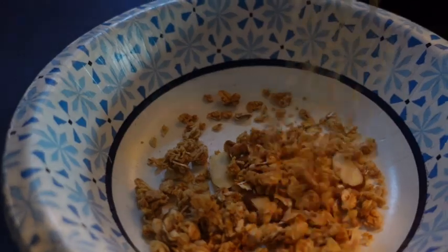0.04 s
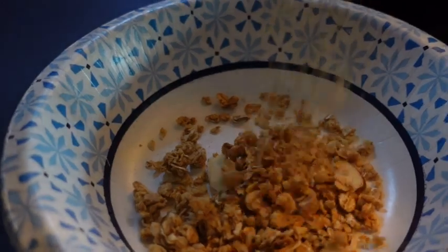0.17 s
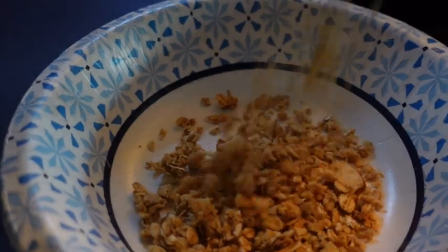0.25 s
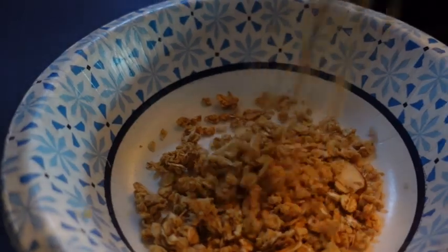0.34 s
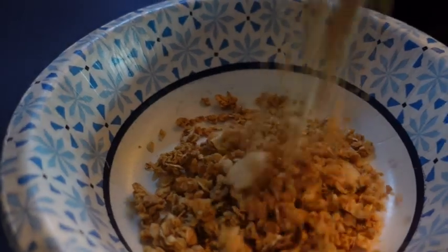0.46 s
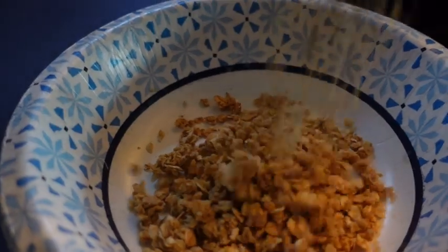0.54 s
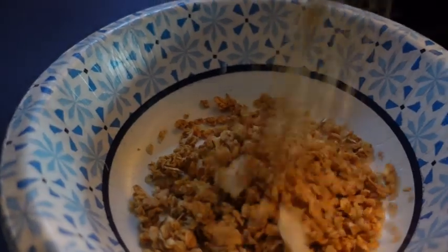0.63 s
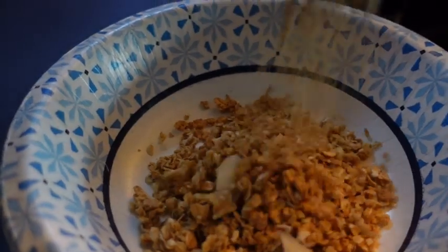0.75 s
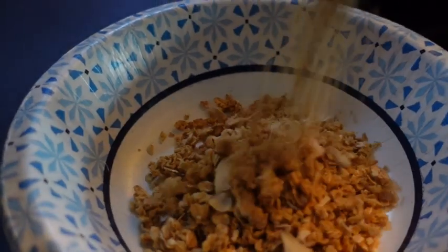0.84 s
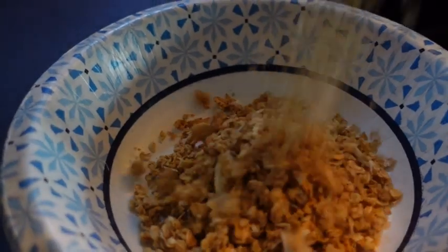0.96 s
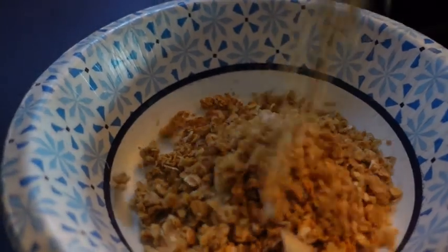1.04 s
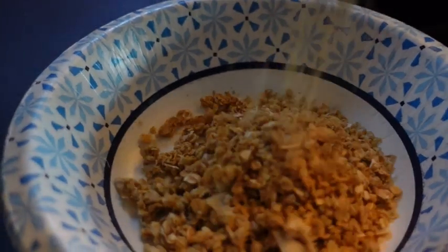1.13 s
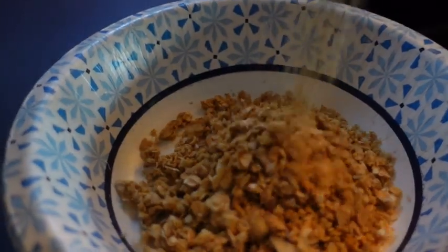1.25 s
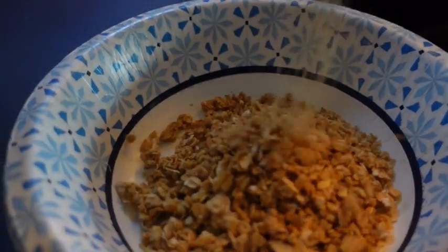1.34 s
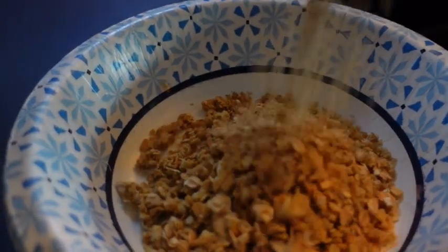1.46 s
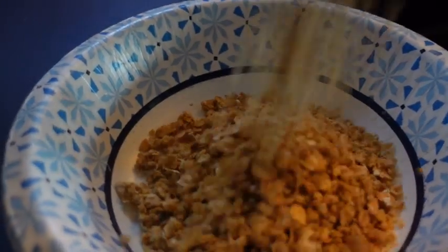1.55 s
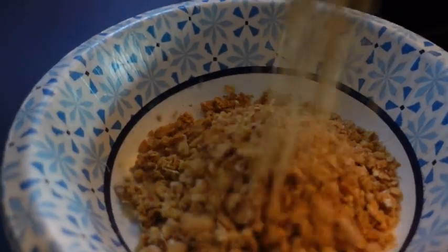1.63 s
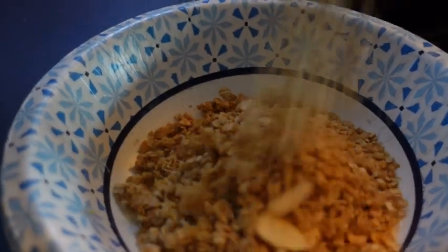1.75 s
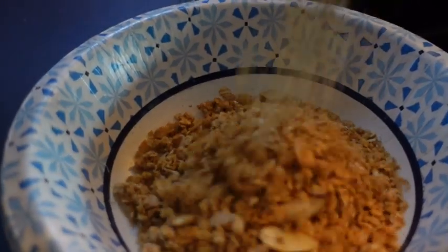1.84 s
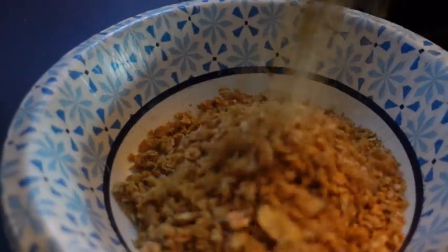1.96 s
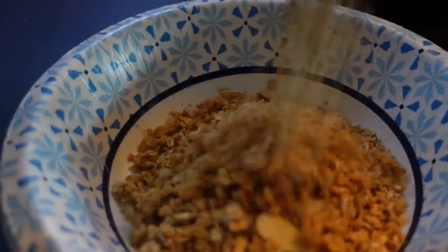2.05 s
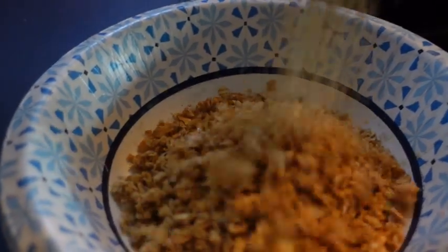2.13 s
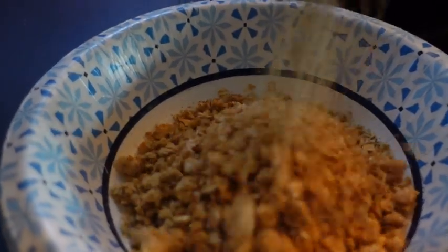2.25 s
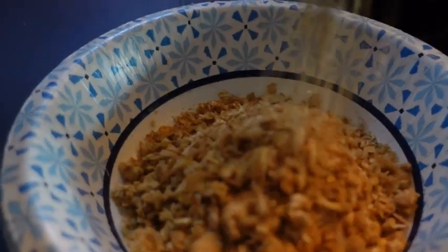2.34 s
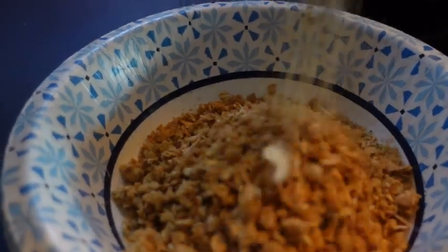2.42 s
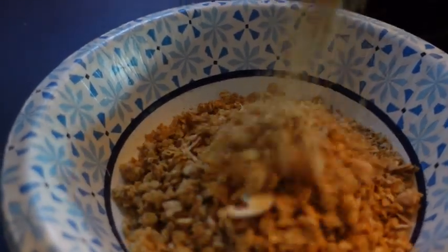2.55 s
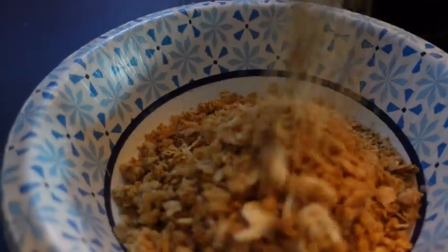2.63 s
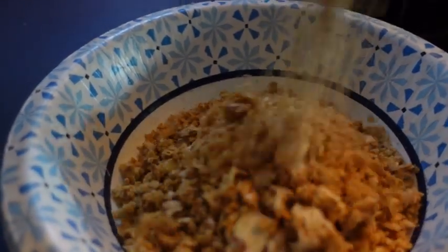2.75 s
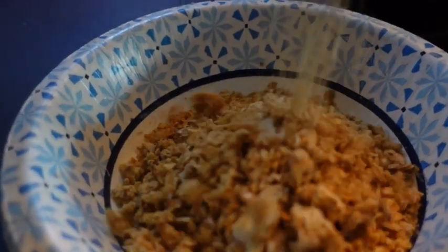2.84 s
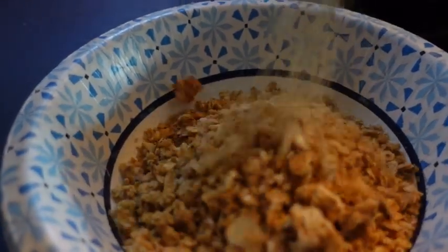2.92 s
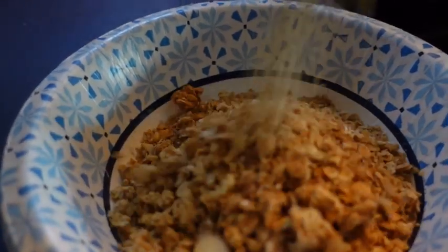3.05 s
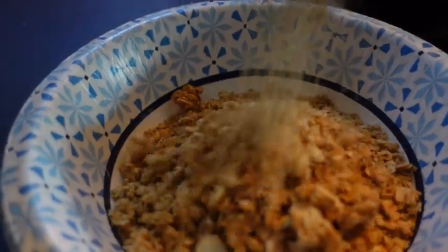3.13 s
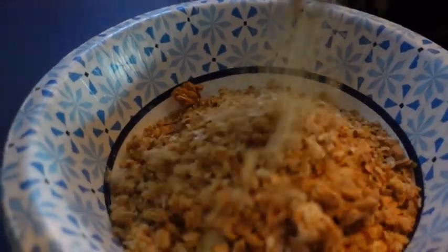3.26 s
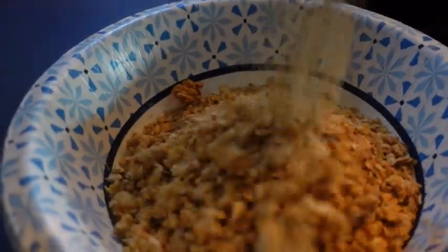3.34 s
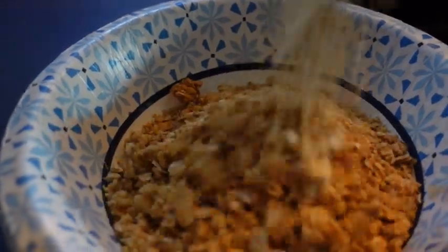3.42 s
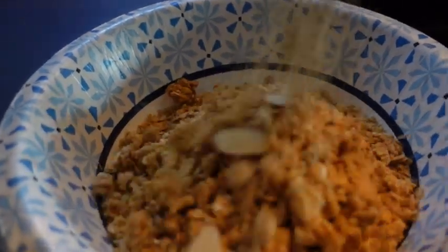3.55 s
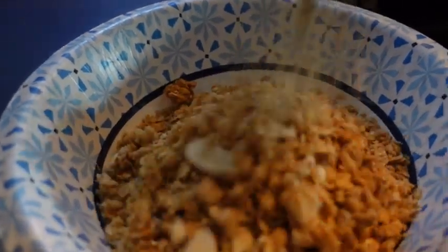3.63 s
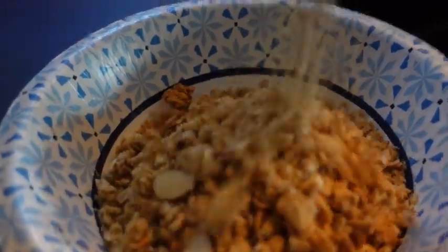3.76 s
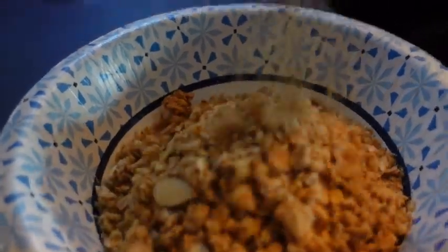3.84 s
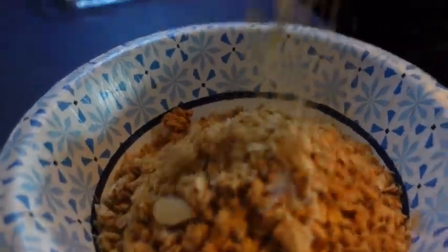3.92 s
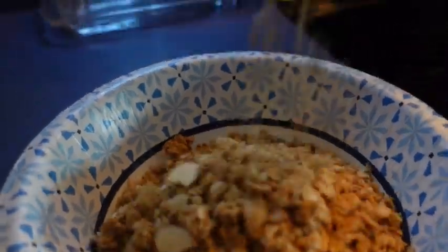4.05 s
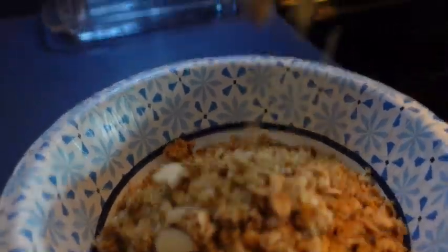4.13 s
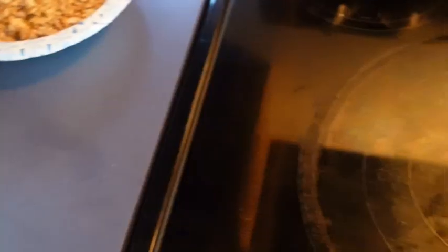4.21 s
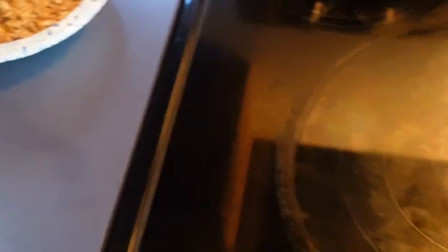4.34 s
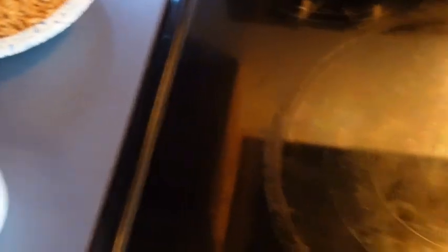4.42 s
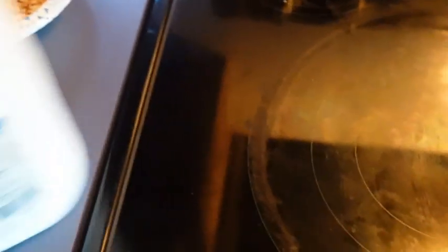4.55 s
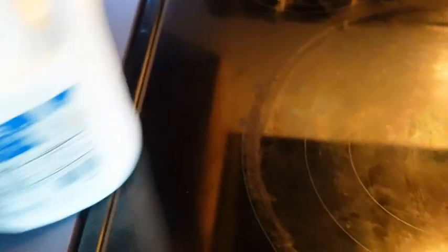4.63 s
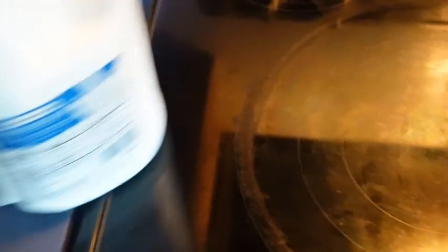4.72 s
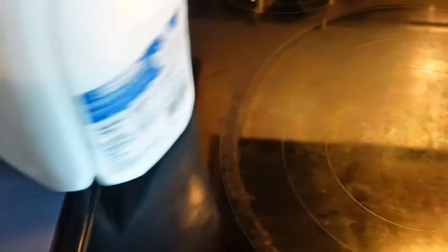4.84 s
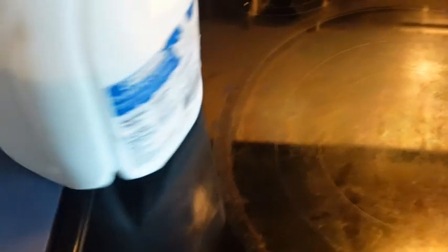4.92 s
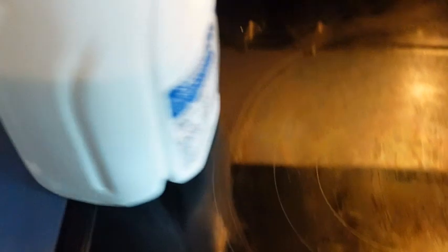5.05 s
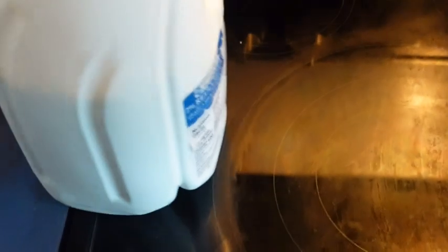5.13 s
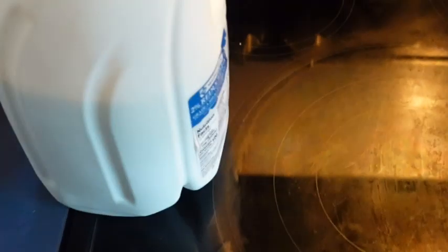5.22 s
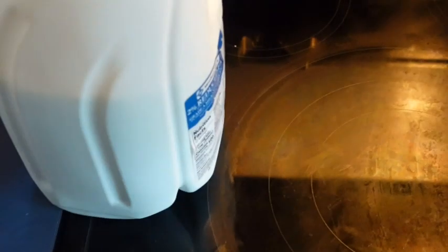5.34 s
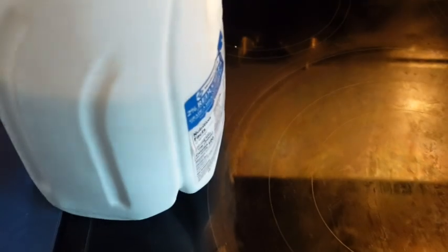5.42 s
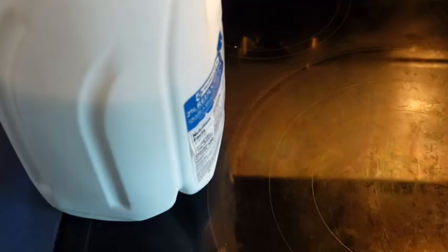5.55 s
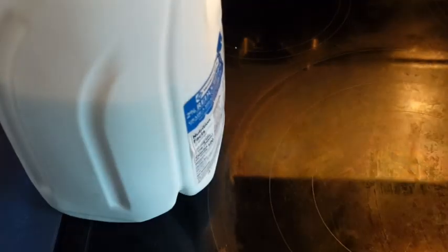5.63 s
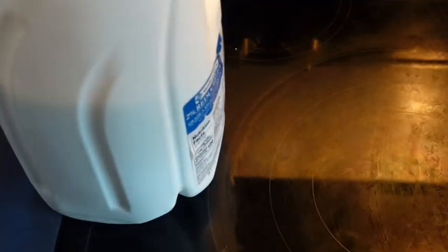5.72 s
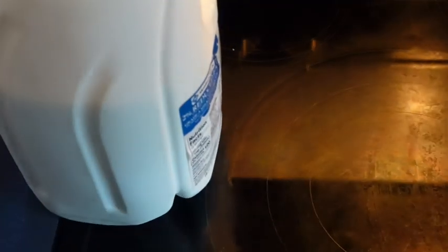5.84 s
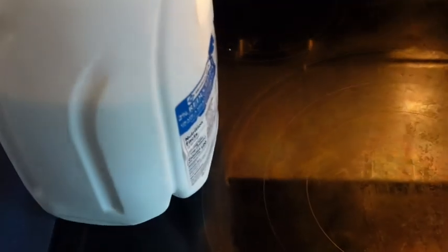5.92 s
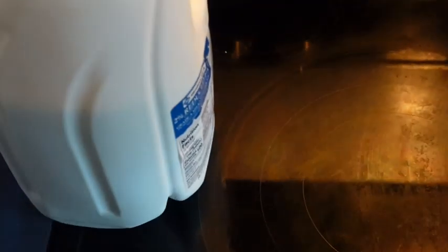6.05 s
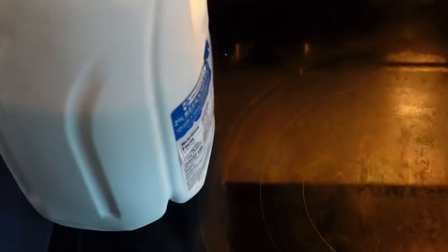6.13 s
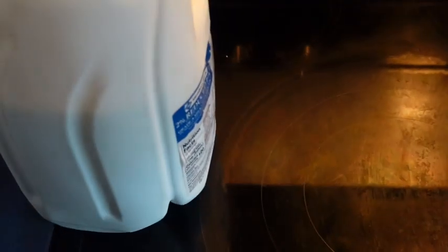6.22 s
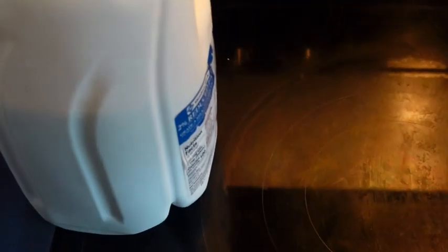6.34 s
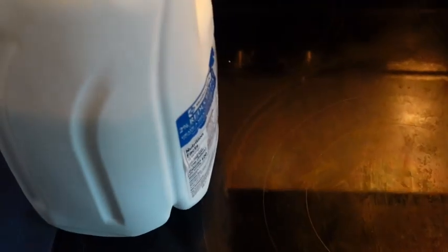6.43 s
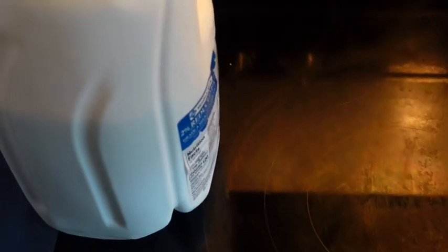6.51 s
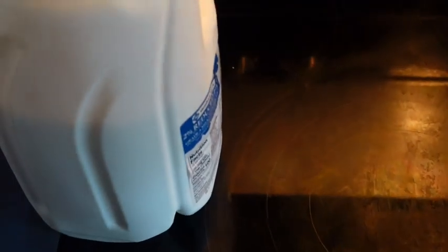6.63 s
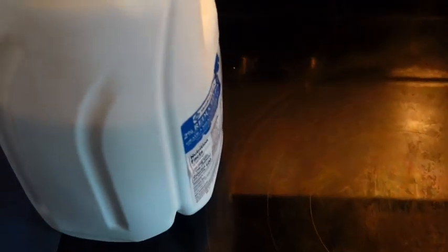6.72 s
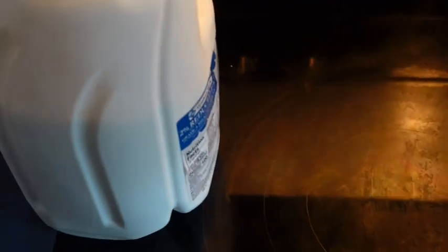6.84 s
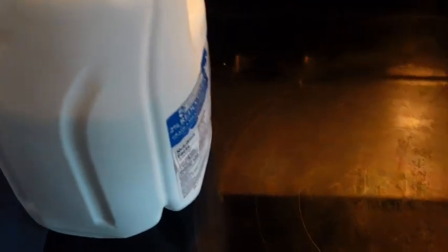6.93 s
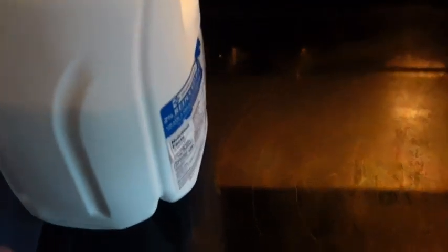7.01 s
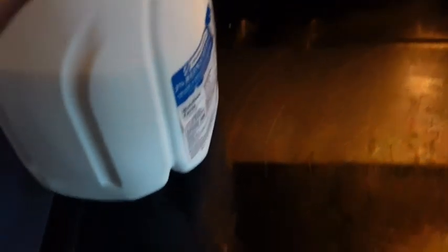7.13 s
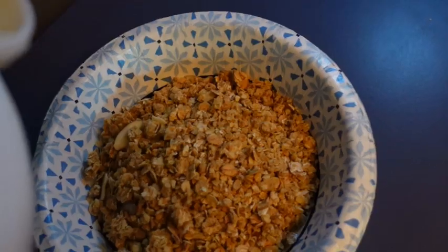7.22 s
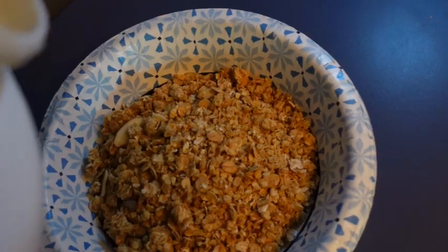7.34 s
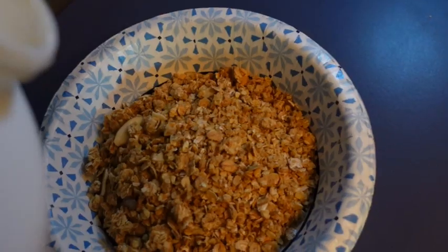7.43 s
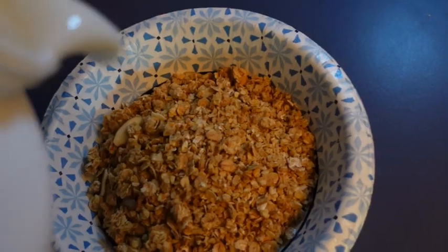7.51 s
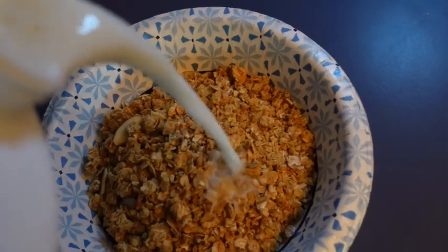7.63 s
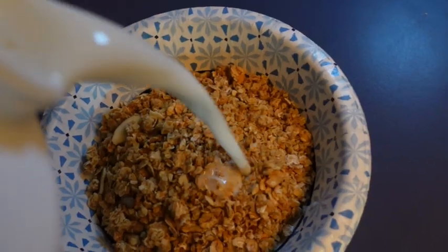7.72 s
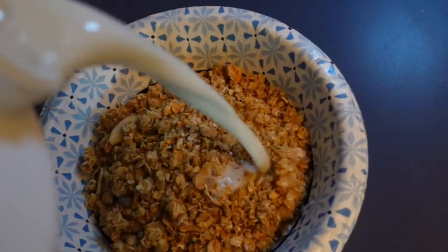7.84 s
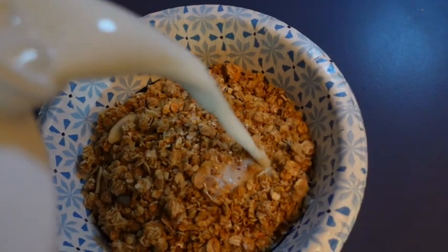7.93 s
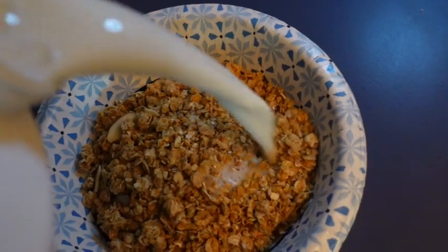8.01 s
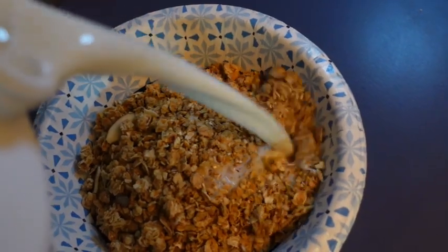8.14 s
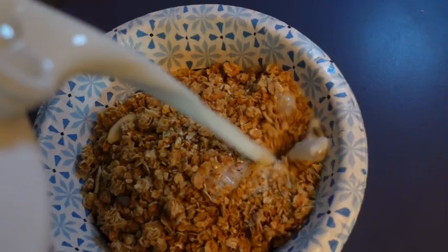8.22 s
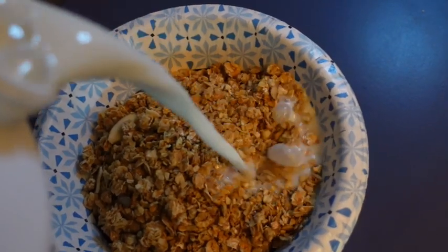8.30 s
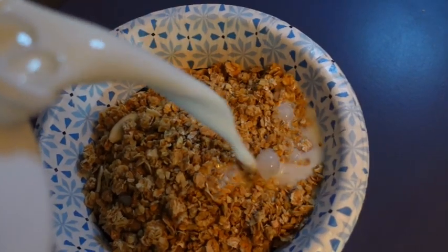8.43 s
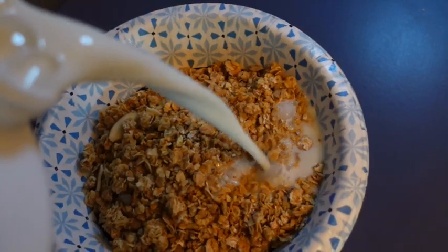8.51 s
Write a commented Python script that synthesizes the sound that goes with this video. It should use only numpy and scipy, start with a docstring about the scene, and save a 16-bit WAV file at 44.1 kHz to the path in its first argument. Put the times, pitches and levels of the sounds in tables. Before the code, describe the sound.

Loud dry grains and crunchy lumps rattle into a paper bowl for about four seconds, the bowl's ring dulling as it fills. Then a milk jug, slightly left and farther off, drags with a gritty hiss, knocks twice or so and goes still over faint hum. Finally a close, bright fizz swells with small ringing pops. Short indoor room reflections and soft air noise throughout.

```python
"""Over room air and faint appliance tones, granola patters into a paper bowl: dense random grains,
with louder clusters as noise snaps that ring the bowl's modes.
After a cut, a full plastic jug scrapes from counter to stove top: banded grains, a faint groan, modal bumps, ticks.
After another cut, the jug bumps again softly, then cereal fizzes and crackles as it soaks up milk:
fine grains for bubbles and froth, ringing snaps for popping air pockets."""
import sys
import numpy as np
from scipy import signal
from scipy.fft import rfft, irfft, next_fast_len
from scipy.io import wavfile
from scipy.ndimage import uniform_filter1d

SR = 44100
rng = np.random.default_rng(int(sys.argv[2]) if len(sys.argv) > 2 else 0)


def inscribe(sig):
    """Save sig as 16-bit PCM at rate SR to the path in sys.argv[1].

    A 1-D sig is mono; a 2-D sig holds one channel per row.
    Samples are clipped to [-1, 1] before scaling.
    """
    pcm = np.round(np.clip(np.atleast_2d(sig).T, -1, 1) * 32767)
    wavfile.write(sys.argv[1], SR, pcm.astype(np.int16))


N = 377937
T = np.arange(N) / SR
CUTOFF_HZ = 16050   # top of the audible band here

# cuts between the three shots: time [s]
CUT_TIMES_S = [4.163, 7.163]
# granola flow out of the box, as patter level: (time [s], level [dB])
POUR_FLOW = [(0.0, -19), (0.39, -20.5), (1.18, -22.5), (1.62, -19.5), (1.93, -23), (2.45, -21.5),
             (2.9, -23), (3.24, -19), (3.85, -25.5), (3.98, -28), (4.1, -31), (4.15, -40)]
# jug bumps: (time [s], level [dB], contact softness [s])
JUG_BUMPS = [(4.860, -28, 0.00026), (4.897, -25.5, 0.00085), (4.935, -31.5, 0.00046),
             (7.197, -34.5, 0.0016), (7.265, -41, .0015), (7.794, -37.5, 0.0013)]


def from_db(db):
    """Decibels to gain."""
    return 10 ** (np.asarray(db) / 20)


def rms_one(x):
    """Scale to unit rms."""
    return x / np.sqrt(np.mean(x ** 2) + 1e-20)


def drift(knots_per_s):
    """Random wander of unit rms, straight lines between random knots."""
    knots = rng.standard_normal(int(knots_per_s * N / SR) + 2)
    return rms_one(np.interp(T * knots_per_s, np.arange(len(knots)), knots))


def gain_curve(rows):
    """Gain along (time [s], level [dB]) rows, silent outside them."""
    s, db = np.transpose(rows)
    gate = np.interp(T, [s[0] - .01, s[0], s[-1], s[-1] + .01], [0, 1, 1, 0])
    return gate * from_db(np.interp(T, s, db))


def colour(x, spectrum):
    """Minimum-phase filter through (Hz, dB) points, falling 18 dB/octave beyond them; unit rms."""
    length = x.shape[-1]
    size = 2 * next_fast_len(length // 2 + SR // 8, real=True)
    log_hz = np.log2(np.maximum(np.fft.rfftfreq(size, 1 / SR), 1))
    points_hz, points_db = np.transpose(spectrum)
    points_oct = np.log2(points_hz)
    beyond_oct = np.abs(log_hz - np.clip(log_hz, points_oct[0], points_oct[-1]))
    shape_db = np.maximum(np.interp(log_hz, points_oct, points_db) - 18 * beyond_oct, -90)
    # keep the causal half of the cepstrum
    cepstrum = irfft(np.log(from_db(shape_db)))
    response = np.exp(2 * rfft(cepstrum[:size // 2], size))
    return rms_one(irfft(rfft(x, size) * response)[..., :length])


def resonate(x, hz, t60_s):
    """Two-pole resonance with unit gain at its peak."""
    r = from_db(-60 / (t60_s * SR))
    w = 2 * np.pi * min(hz, CUTOFF_HZ) / SR
    b = [(1 - r * r) / 2, 0, (r * r - 1) / 2]
    a = [1, -2 * r * np.cos(w), r * r]
    return signal.lfilter(b, a, x + 1e-18)


def steady(x):
    """Divide out the 0.1 s running level, so that the flow alone sets it."""
    return x / np.sqrt(np.abs(uniform_filter1d(x * x, SR // 10)) + 1e-9)


def grains(level, spectrum, per_s, spread_db, cycles, clump_db=0, count=30):
    """Random tiny impacts, swelling in clumps, each exciting a bank of resonances (60 dB decay in cycles)."""
    on = level > 0
    clicks = np.zeros(on.sum())
    at = np.flatnonzero(rng.random(len(clicks)) < per_s / SR)
    sizes = from_db(spread_db * np.minimum(rng.exponential(1, len(at)), 4))
    rings, out = 0, np.zeros(N)
    for hz in np.geomspace(spectrum[0][0], min(spectrum[-1][0], CUTOFF_HZ), count):
        # a grain has its own strength at every pitch
        clicks[at] = sizes * rng.standard_normal(len(at))
        rings = rings + resonate(clicks, hz, cycles / hz)
    out[on] = colour(rings, spectrum)
    return level * steady(out * from_db(clump_db))


def cracks(rows, crumble_s, ring_cycles, ring_db, overtone_db, top_hz, tail_db, tail_s):
    """Noise snaps that crumble away in uneven bits, each ringing at its own pitch with its bass removed."""
    out, t = np.zeros(N + SR), T[:SR // 16]
    for s, db, hz in rows:
        hz = min(hz, CUTOFF_HZ)
        bit_steps = np.repeat(rng.standard_normal(len(t)), 40)[:len(t)].clip(-2, 2)
        bits = rms_one(from_db(6.5 * bit_steps))
        fade = np.exp(-t / crumble_s) + from_db(tail_db) * bits * np.exp(-t / tail_s)
        burst = rng.standard_normal(len(t)) * fade
        highpass = signal.butter(4, hz * .6, "high", fs=SR, output="sos")
        lowpass = signal.butter(1, min(top_hz + hz, CUTOFF_HZ), fs=SR, output="sos")
        snap = signal.sosfilt(lowpass, signal.sosfilt(highpass, burst))
        ring = rms_one(resonate(snap, hz, ring_cycles / hz))
        overtone = rms_one(resonate(snap, hz * rng.uniform(1.4, 2), ring_cycles / hz))
        hit = rms_one(snap) + from_db(ring_db) * ring + from_db(overtone_db) * overtone
        start = int(s * SR)
        out[start:start + len(t)] += from_db(db) * hit / np.std(hit[t < .006])   # level of the first 6 ms
    return out[:N]


def appliance_tones(by_stove, waver_db, waver_rad):
    """Steady hum and whine, wavering slightly in level and phase."""
    # appliance tones: (frequency [Hz], level by the bowl [dB], level by the stove [dB])
    tone_rows = [(57, -63.5, -73), (115, -69, -71.5), (209.3, -62, -81), (231, -64, -70.5), (297, -68, -68),
                 (3225, -81.5, -99), (3480, -82, -99), (3700, -83, -88), (5152, -83, -105),
                 (5500, -105, -79.5), (7757, -81.5, -105)]
    out = 0
    for hz, bowl_db, stove_db in tone_rows:
        level_db = np.where(by_stove, stove_db, bowl_db) + waver_db * drift(7.8)
        phase = 2 * np.pi * hz * T + waver_rad * drift(12)
        out = out + np.sqrt(2) * from_db(level_db) * np.sin(phase)
    return out


def room_tone():
    """Coloured air noise, mostly in phase across the stereo pair, plus hum; levels change with the shot."""
    # air noise spectrum: (frequency [Hz], relative level [dB])
    air_bands = [(45, -28.5), (81, -12.5), (109, -11), (270, -5), (340, -10), (666, -15), (1630, -22.5),
                 (3310, -28.5), (6550, -33), (16000, -38)]
    # air noise in each shot, mid channel: level [dB]
    shot_air_db = [-51, -58.5, -55.5]
    shot = np.searchsorted(CUT_TIMES_S, T)
    mid, side = colour(rng.standard_normal((2, N)), air_bands)
    air = from_db(shot_air_db)[shot] * (mid + from_db(-7.5) * side * [[1], [-1]])
    return air + appliance_tones(shot == 1, waver_db=2.5, waver_rad=0.27)


def small_clusters(count):
    """Rows (s, dB, Hz) of lesser clusters scattered through the pour, following its flow."""
    level_db, spread_db, grow_db_per_s = -0.3, 2.5, 0.54   # against the flow; coarser pieces follow the crumbs
    middle_hz, spread_oct, dulls_oct_per_s = 4600, 1.08, 0.12   # lower as the heap deepens
    place = rng.random(count)
    size, pitch = rng.uniform(-1, 1, (2, count))
    s = (np.arange(count) + place) / count * POUR_FLOW[-2][0]
    flow_db = np.interp(s, *np.transpose(POUR_FLOW))
    db = flow_db + level_db + grow_db_per_s * s + spread_db * size
    hz = middle_hz * 2 ** (spread_oct * pitch - dulls_oct_per_s * s)
    return np.c_[s, db, hz]


def granola():
    """Flakes and crumbs arrive in the same clumps; the bowl rings less as the heap covers it."""
    # flake spectrum: (frequency [Hz], relative level [dB])
    flake_bands = [(90, -31), (150, -16.5), (260, -12.5), (450, -14), (640, -13.5), (780, -7), (1260, -5),
                   (1900, -0.5), (2900, -3.5), (4500, -3), (6000, -4)]
    # crumb spectrum: (frequency [Hz], relative level [dB])
    crumb_bands = [(1500, -25), (3000, -7), (5000, -3), (7000, -2.5), (10000, -3.5), (16000, -9)]
    # biggest clusters landing: (time [s], level [dB], pitch [Hz])
    big_clusters = [(0.068, -17, 4720), (0.118, -15.5, 8000), (0.162, -17, 5700), (0.379, -13.5, 5000),
                    (0.578, -15, 1900), (0.595, -16.5, 2000), (0.794, -15, 5000), (0.853, -15.5, 4200),
                    (0.879, -15.5, 1940), (0.91, -15, 2500), (0.942, -16.5, 2750), (0.973, -15.5, 2610),
                    (1.251, -17.5, 4070), (1.283, -16, 2810), (1.297, -16, 2000), (1.563, -13.5, 1920),
                    (1.602, -11, 4300), (1.632, -15.5, 1470), (1.691, -15.5, 4200), (1.706, -15.5, 2190),
                    (1.815, -17, 4805), (1.835, -14.5, 4280), (1.867, -20.5, 8540), (1.956, -10.5, 1830),
                    (2.024, -14, 5200), (2.04, -17.5, 6000), (2.174, -15.5, 3800), (2.278, -15, 2000),
                    (2.295, -18.5, 2910), (2.405, -16.5, 1860), (2.524, -15, 3950), (2.597, -14, 1980),
                    (2.636, -15, 3470), (2.722, -14.5, 3000), (2.8, -16, 3110), (2.92, -14.5, 1450),
                    (3.008, -12.5, 2100), (3.106, -15.5, 2300), (3.18, -16.5, 6950), (3.212, -14, 3700),
                    (3.224, -12, 3000), (3.28, -14, 3450), (3.293, -16.5, 2900), (3.345, -14, 2400),
                    (3.384, -13.5, 2220), (3.556, -16.5, 3000), (3.58, -14.5, 2500), (3.636, -15.5, 4050),
                    (3.777, -16, 5100), (3.788, -15.5, 2610), (3.825, -14.5, 2060), (3.845, -19.5, 2160),
                    (3.95, -19, 2500), (3.982, -13.5, 3080), (4.021, -20, 5540), (4.072, -20, 9000),
                    (4.115, -18.5, 14000), (4.125, -19.5, 2500)]
    # paper bowl modes: (frequency [Hz], relative level [dB], t60 [s])
    bowl_modes = [(790, -7, 0.059), (1450, 3.5, 0.04), (1920, 1, .03), (2958, -2.5, .02), (4940, -8, 0.012)]
    flakes_db, crumbs_db = -4.5, -0.6   # against the flow, at the start
    crumbs_thin_db_per_s = 0.8   # the fine crumbs run out first

    flow = gain_curve(POUR_FLOW)
    flakes = flow * from_db(flakes_db)
    crumbs = flow * from_db(crumbs_db - crumbs_thin_db_per_s * T)
    clumps_db = 2.0 * drift(90)
    coarse = grains(flakes, flake_bands, per_s=1300, spread_db=3.0, cycles=14.3, clump_db=clumps_db, count=40)
    fine = grains(crumbs, crumb_bands, per_s=2600, spread_db=2.5, cycles=20, clump_db=clumps_db)
    landings = np.vstack([big_clusters, small_clusters(count=44)])
    clusters = cracks(landings, crumble_s=0.0022, ring_cycles=9.1, ring_db=1.5, overtone_db=-7.5,
                      top_hz=4500, tail_db=-12.5, tail_s=0.02)
    fall = coarse + fine + clusters

    bare_db = np.interp(T, [0, CUT_TIMES_S[0]], [-2, -14])
    bowl = sum(from_db(db) * resonate(fall, hz, t60_s) for hz, db, t60_s in bowl_modes)
    # big pieces thud dully, more as the heap deepens
    heap_db = np.interp(T, [0, CUT_TIMES_S[0]], [0, 8])
    thud = from_db(heap_db) * resonate(clusters, hz=500, t60_s=0.012)
    return fall + from_db(bare_db) * bowl + thud


def jug_drag():
    """The base rubs over countless tiny bumps; the milk-loaded walls rumble and groan, most on the stove top."""
    # drag speed, as scrape level: (time [s], level [dB])
    drag_flow = [(4.18, -53), (4.37, -32), (4.532, -27.5), (4.56, -22.5), (4.736, -31), (5.038, -43.5),
                 (5.294, -66), (5.4, -73)]
    # low rumble spectrum: (frequency [Hz], relative level [dB])
    rumble_bands = [(70, -17), (112, -7.5), (162, -7.5), (210, 1), (303, -5.5), (400, 2.5), (572, -7),
                    (850, -3), (1150, -5.5)]
    # middle scrape spectrum: (frequency [Hz], relative level [dB])
    scrape_bands = [(500, -8), (650, -13), (810, -5), (1700, -0.5), (3300, -6), (5000, -17)]
    # high hiss spectrum: (frequency [Hz], relative level [dB])
    hiss_bands = [(3500, -4.5), (8000, -8.5), (9500, -14), (16000, -18.5)]
    cross_at_s, cross_s = 4.67, 0.12   # from the counter onto the hollow stove top
    rumble_db, hiss_db = [-14.5, 2], [-4, -7.5]   # against the scrape: counter, stove
    lift_db, lift_s = -4.5, 0.035   # the base tips up just before its first bump: scrape change, half-width
    groan_hz, groan_db, groan_follows = 411, -45.5, 0.25   # pitch, level at full speed, share of scrape's swing
    rises_at_s, rise_hz_per_s = 5.15, 360   # groan climbs as the jug comes to rest

    lifted = np.exp(-((T - JUG_BUMPS[0][0] + lift_s) / lift_s) ** 2)
    scrape = gain_curve(drag_flow) * from_db(lift_db * lifted)
    crossing_s = [cross_at_s, cross_at_s + cross_s]
    rumble = scrape * from_db(np.interp(T, crossing_s, rumble_db))
    hiss = scrape * from_db(np.interp(T, crossing_s, hiss_db))
    low = grains(rumble, rumble_bands, per_s=1500, spread_db=4.0, cycles=6.7)
    middle = grains(scrape, scrape_bands, per_s=7000, spread_db=-1.0, cycles=25, clump_db=1.5 * drift(100))
    high = grains(hiss, hiss_bands, per_s=10000, spread_db=-1.0, cycles=14, clump_db=0.9 * drift(150))

    hz = groan_hz + rise_hz_per_s * np.maximum(T - rises_at_s, 0)
    phase = 2 * np.pi * np.cumsum(hz) / SR + 1.8 * drift(60)
    speed = (scrape / scrape.max()) ** groan_follows
    groan = speed * from_db(groan_db + 3.7 * drift(25)) * np.sin(phase)
    # the thin wall rings along on the stove
    on_stove = np.interp(T, crossing_s, [0, 1])
    wall = from_db(-4) * on_stove * resonate(middle, hz=2440, t60_s=0.026)
    return low + middle + high + groan + wall


def jug_bumps():
    """Every bump rings the same modes; soft contact weakens the high ones; the deepest bass is cut away."""
    # full jug modes: (frequency [Hz], relative level [dB], t60 [s])
    jug_modes = [(67, -10, 0.4), (108.7, -5.5, 0.46), (136, -3.5, 0.14), (202, -2.5, 0.21), (324, -5, 0.2),
                 (379, -6.5, 0.19), (497, -3, 0.087), (713, -4, 0.075), (790, -7, .12), (1070, 2, 0.033)]
    out, t = np.zeros(N), T[:SR // 2]
    for s, db, soft_s in JUG_BUMPS:
        ring = 0
        for k, (hz, mode_db, t60_s) in enumerate(jug_modes):
            strength = from_db(mode_db) / np.hypot(1, 2 * np.pi * hz * soft_s)
            sign = (-1) ** k
            ring = ring + sign * strength * np.sin(2 * np.pi * hz * t) * from_db(-60 * t / t60_s)
        start = int(s * SR)
        out[start:start + len(t)] += from_db(db) * ring
    return signal.sosfilt(signal.butter(4, 60, "high", fs=SR, output="sos"), out)


def jug_ticks():
    """Sharp ticks of the plastic jug: short noise snaps with a ringing pitch."""
    # ticks: (time [s], level [dB], pitch [Hz])
    tick_rows = [(4.861, -26.5, 1710), (4.866, -36, 7000), (4.891, -30.5, 1690), (5.062, -44, 1200),
                 (6.674, -50, 5400)]
    return cracks(tick_rows, crumble_s=0.0031, ring_cycles=25, ring_db=-1.0, overtone_db=-20,
                  top_hz=5000, tail_db=-23, tail_s=.006)


def milk_soaking():
    """Milk drives air out of the cereal: tiny bubbles fizz, larger pockets pop."""
    # milk flow into the cereal, as soaking level: (time [s], level [dB])
    soak_flow = [(7.648, -50.5), (7.686, -36.5), (7.716, -42.5), (7.79, -38), (8.15, -21), (8.298, -28.5),
                 (8.344, -37.5), (8.565, -26)]
    # larger-bubble crackle spectrum: (frequency [Hz], relative level [dB])
    crackle_bands = [(750, -26.5), (1100, -7.5), (1680, -5), (2430, 3.5), (3120, -3.5), (5000, -9)]
    # froth spectrum: (frequency [Hz], relative level [dB])
    fizz_bands = [(3500, -7.5), (5800, -1.5), (11000, -9), (16000, -11.5)]
    # air pockets popping: (time [s], level [dB], pitch [Hz])
    pop_rows = [(7.875, -28, 2330), (7.938, -25, 2360), (7.965, -25, 2320), (8.102, -25, 2500),
                (8.118, -19.5, 2820), (8.191, -18.5, 2520), (8.238, -20.5, 2450), (8.289, -22.5, 5330),
                (8.519, -28, 1200)]
    crackle_db, fizz_db = -2.5, -3.5   # against the flow
    wetting_s, dry_db = 0.14, -15.5   # larger bubbles start this much weaker, until the milk has sunk in

    flow = gain_curve(soak_flow)
    wetting_db = np.interp(T - soak_flow[0][0], [0, wetting_s], [dry_db, 0])
    crackle = flow * from_db(crackle_db + wetting_db)
    fizz = flow * from_db(fizz_db)
    clumps_db = 1.7 * drift(120)
    bubbles = grains(crackle, crackle_bands, per_s=2500, spread_db=2.0, cycles=16, clump_db=clumps_db)
    froth = grains(fizz, fizz_bands, per_s=4500, spread_db=0.5, cycles=9.8, clump_db=clumps_db)
    pops = cracks(pop_rows, crumble_s=0.0014, ring_cycles=20, ring_db=10.5, overtone_db=3.5,
                  top_hz=3000, tail_db=-18, tail_s=0.01)
    return bubbles + froth + pops


def kitchen(x, common_db, side_db, treble_db, scatter_db):
    """Counter and walls return a short noise tail; the stereo balance of the direct sound keeps shifting."""
    room_t60_s = 0.11
    t = T[:SR // 3]
    fade = from_db(-60 * t / room_t60_s) + 1.3 * np.exp(-t / .004)
    tails = rng.standard_normal((2, len(t))) * fade * (t > .001)
    mid, side = (signal.fftconvolve(x, h / np.linalg.norm(h))[:N] for h in tails)
    treble = np.diff(x, prepend=0)
    spots = drift(250) * (from_db(scatter_db) * x + from_db(treble_db) * treble)
    side = from_db(side_db) * side + spots
    return x + from_db(common_db) * mid + side * np.array([[1], [-1]])


def scene():
    """The bowl is close and nearly centred; the jug is further off and a little to the left."""
    bowl = kitchen(granola() + milk_soaking(), common_db=-13, side_db=-22, treble_db=-22.5, scatter_db=-24.0)
    jug = kitchen(jug_drag() + jug_bumps() + jug_ticks(),
                  common_db=-11.5, side_db=-21, treble_db=-24, scatter_db=-20.0)
    # left and right gains [dB]
    bowl = bowl * from_db([[.13], [-.13]])
    jug = jug * from_db([[.5], [-.5]])
    return bowl + jug + room_tone()


def record(dry):
    """Each cut leaves a moment of silence; high peaks are rounded and the top of the band is cut off."""
    gaps = np.prod([np.clip((np.abs(T - s) - .007) / .001, 0, 1) for s in CUT_TIMES_S], axis=0)
    rounded = gaps * dry / (1 + (dry / .8) ** 4) ** .25
    lowpass = signal.ellip(12, .1, 80, CUTOFF_HZ, fs=SR, output="sos")
    return signal.sosfilt(lowpass, rounded)


dry = scene()
out = record(dry)
inscribe(out)
```